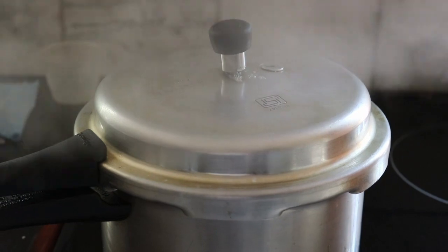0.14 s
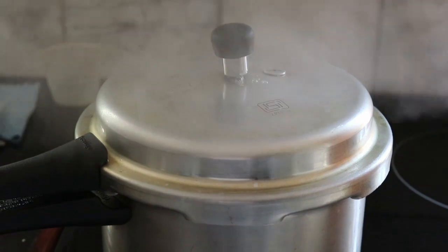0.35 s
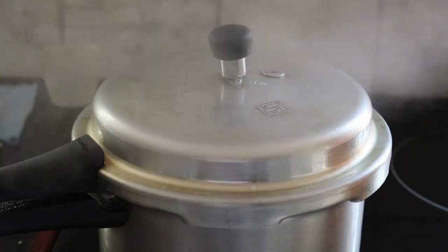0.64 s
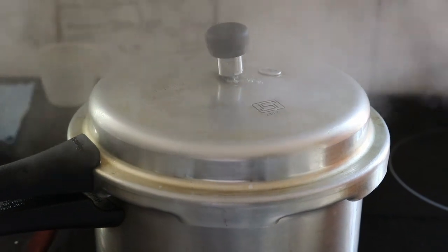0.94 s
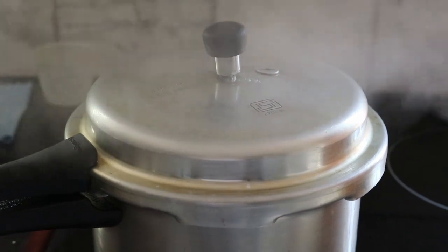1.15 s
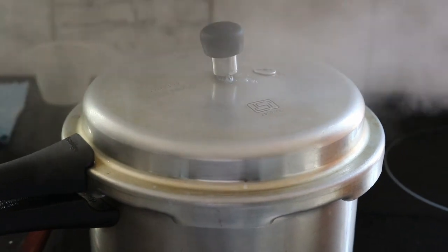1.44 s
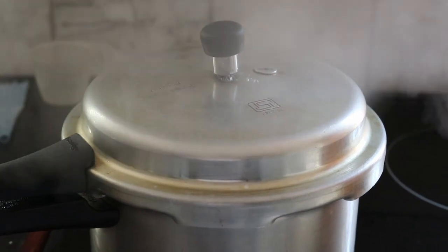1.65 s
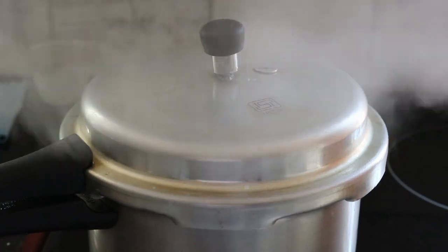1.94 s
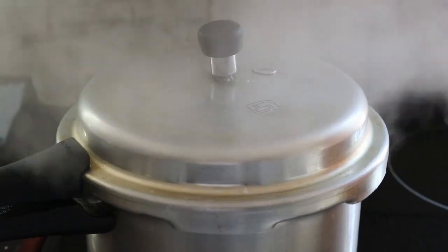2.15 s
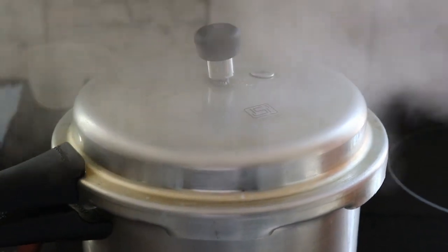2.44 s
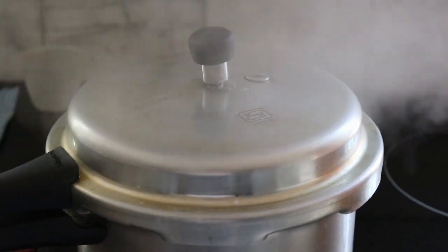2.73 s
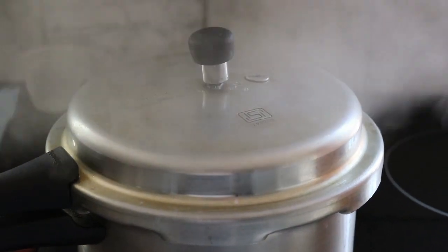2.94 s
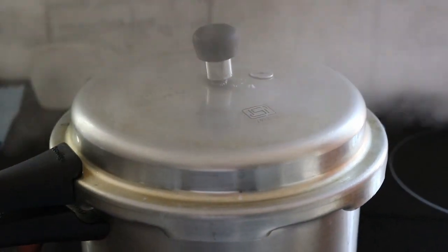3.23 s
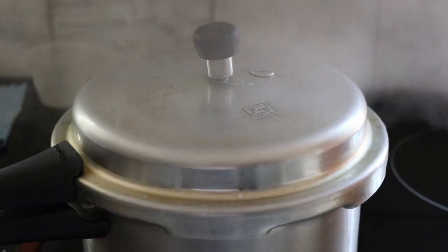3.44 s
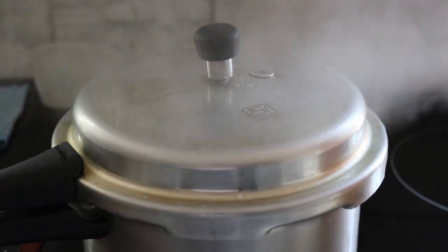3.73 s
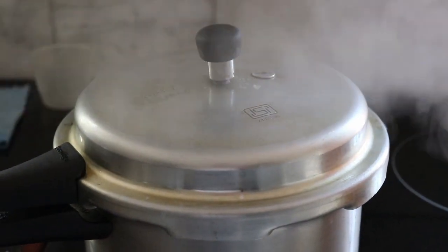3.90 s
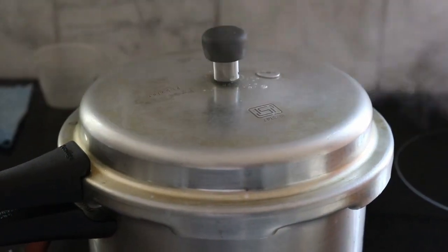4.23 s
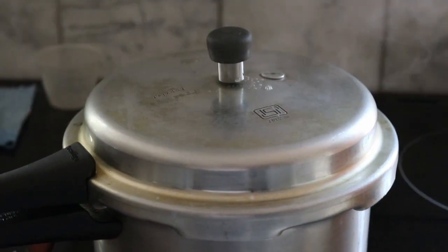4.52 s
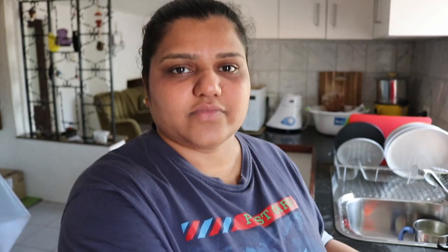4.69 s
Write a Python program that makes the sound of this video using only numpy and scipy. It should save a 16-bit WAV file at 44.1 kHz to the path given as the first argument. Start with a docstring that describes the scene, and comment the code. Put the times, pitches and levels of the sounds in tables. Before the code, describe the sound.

In a tiled kitchen, a close pressure cooker vents a loud, bright, steady hiss, fluttering gently under its rocking weight. Just after four seconds a few quick spurts end in a short hollow gasp, and reflections fade over faint rumble and leak. The background then abruptly becomes louder and duller, with a soft double knock and a sharp chattering clink.

```python
"""Pressure cooker venting in a tiled kitchen

A turbulent steam jet, filtered noise with narrow peaks and dips, hisses loudly and flutters under a rocking weight.
The weight settles with a short hollow gasp of resonant noise; reflections die away over rumble and a thin leak.
Then the background turns abruptly louder and duller, by a short fade between steady noises.
A soft double knock and one sharp, chattering clink follow, each built from decaying modes and noise bursts."""
import sys
import numpy as np
from scipy import signal
from scipy.fft import rfft, irfft
from scipy.io import wavfile

SR = 44100
rng = np.random.default_rng(int(sys.argv[2]) if len(sys.argv) > 2 else 0)


def persist_wave(psi):
    """Save psi, clipped to +-1, as 16-bit WAV."""
    counts = np.round(np.clip(psi, -1, 1) * 32767).astype(np.int16)
    wavfile.write(sys.argv[1], SR, np.atleast_2d(counts).T)


N = 214193
TIME = np.arange(N) / SR
BINS = np.fft.rfftfreq(N, 1 / SR)

# Relative spectra of room rumble, leaking pot and later background: frequency_hz, density_db (dB per Hz)
RUMBLE_COLOUR = [(15, -24), (28, -9), (44, 3), (62, 0), (77, -0.5), (95, -4.5), (160, -0.5), (260, -7.5),
                 (600, -19), (3000, -60)]
LEAK_COLOUR = [(100, -25), (200, -12), (280, -0.5), (400, -3.5), (520, -9), (1400, -8), (2500, -11.5),
               (4600, -15.5), (6800, -3.5), (8500, -11), (11000, -7), (15500, -16)]
LATER_COLOUR = [(15, -41), (25, -10), (79, -4.5), (148, -15.5), (421, -13), (826, -22), (1140, -20),
                (1490, -25), (3090, -28.5), (3340, -23), (3930, -27), (4380, -33), (9300, -30.5),
                (15500, -48)]
# Channel balance of the later background: frequency_hz, left_minus_right_db
LATER_LEAN = [(30, 7), (80, -1), (160, 4), (300, -3.5)]
CHANGE_S = 4.621  # when the background changes

# Decay of the tile reflections: frequency_hz, t60_s
REFLECTION_DECAY = [(200, 0.22), (1400, 0.57), (4000, 0.5), (7000, 0.46), (11000, 0.42), (15000, 0.27)]

# Touches of the chattering clink: start_s, level_db
CLINK_TOUCHES = [(4.8286, -19), (4.8304, -12.5), (4.8319, -21)]
# Modes of the small hard thing: pitch_hz, level_db, t60_s
CLINK_MODES = [(2000, -16, 0.023), (3149, -31, 0.015), (5540, 2.5, 0.018), (6420, 4.5, 0.032),
               (6420, -11, .2), (7490, -6, 0.026), (8190, -6, 0.038), (12200, -22, .012)]
# Soft blows: start_s, level_db, contact_s, left_minus_right_db
KNOCK_BLOWS = [(4.7596, -29, 0.00037, 7), (4.7688, -21.5, .0011, 5.5)]
# Modes of the knocked body: pitch_hz, level_db, t60_s
KNOCK_MODES = [(72.7, -5, 0.23), (160, -10.5, 0.14), (265, -9, 0.061), (590, 4.5, 0.013),
               (1180, -2.5, 0.021), (1700, -4, 0.014), (2450, -20, .008)]

# Hollow resonances woken as the weight settles: pitch_hz, half_width_hz, level_db, loudest_s, spread_s
HOLLOW_RESONANCES = [(304, 100, -64, 4.18, 0.054), (680, 77, -63.5, 4.17, 0.12),
                     (870, 33, -49.5, 4.175, 0.038), (1110, 86, -54.5, 4.125, 0.081),
                     (1360, 60, -56.5, 4.17, 0.085), (1720, 87, -57, 4.18, 0.049),
                     (2090, 60, -68, 4.17, .05)]

# Relative spectrum of the jet: frequency_hz, density_db (dB per Hz)
JET_COLOUR = [(120, -72), (200, -41), (497, -34.5), (1380, -20.5), (1740, -17.5), (1840, -15), (2560, -9),
              (2750, -11), (3180, -6.5), (5110, -8), (6830, -1), (8500, -7), (10200, -1), (11400, -3),
              (15500, -19)]
# Narrow peaks and dips that fixed reflections leave in the hiss: frequency_hz, lift_db
REFLECTION_RIPPLE = [(689, 3.5), (883, 3), (1227, 3.5), (1378, 3), (1895, 1.5), (2089, 1), (2218, 3),
                     (2541, 2), (2929, 2), (4802, 2.0), (6395, -1.5), (6697, 4.5), (7084, 6), (7558, 0),
                     (7989, -10), (8398, 4), (9647, 5.5), (9905, 4), (10271, 0), (10508, 4), (10939, 5.5),
                     (11822, 6.5)]
# Likeness of the jet at left and right: frequency_hz, likeness (0 to 1)
JET_LIKENESS = [(100, 0.93), (700, 0.89), (3200, 0.81), (4200, 0.15), (5000, 0.97), (7000, 0.99),
                (8000, 0.13), (9500, 0.47), (15000, 0.52)]
# Phase between the two microphones: frequency_hz, left_lead_rad
JET_LEAD = [(0, 0), (2930, -0.3), (3880, -1.5), (4820, -0.3), (5430, -0.5), (7150, -1.3), (8350, -0.8),
            (8960, -2.3), (10600, -1.5), (11800, 0.5), (14700, -1.7), (16100, -1.6)]
# Channel balance of the jet: frequency_hz, left_minus_right_db
JET_LEAN = [(60, -4), (95, -2), (150, 0), (240, -3), (380, -2.5), (600, -0.5), (950, -1.5), (1500, -3.5),
            (2380, -2.5), (3770, -3), (5980, -4.5), (9470, -5.0), (15000, -2)]
# Slow drift of the steam pressure, before the jet's overall gain: time_s, relative_level_db
PRESSURE_DRIFT = [(0, -22), (.85, -23), (1.35, -22), (2.0, -23), (2.6, -23), (3.2, -22.5), (3.6, -23.5),
                  (3.85, -26), (4.1, -24.5)]
# Higher lifts of the weight, each letting out a spurt: centre_s, half_length_s, lift_db
SPURTS = [(.68, .05, 0.9), (3.765, .05, 2.5), (3.942, 0.038, 4), (4.097, 0.011, 2)]

# The rocking builds up and dies down
ROCK_HZ, ROCK_DB, ROCK_WIDEST_S, ROCK_SPREAD_S = 6.4, 0.9, 2.64, 0.64
# Low and top parts of the hiss: initial level, share of the gap's dB swing, slow growth
THROATY_DB, THROATY_SWING, THROATY_DB_PER_S = -0.97, 0.87, 0.32
FINE_DB, FINE_SWING, FINE_DB_PER_S = -1.22, 1.23, 0.55
# The sinking weight thins both ends of the hiss
SINK_S, THROATY_SINK_DB_PER_S, FINE_SINK_DB_PER_S = 3.972, 48, 27
SHUT_S, SHUT_FALL_S = 4.106, 0.017  # when the vent closes, and the time constant of the jet's decay

EDGE_HZ = 15780  # upper limit of the output band


def gain_of(db):
    """Logarithmic level: decibels to an amplitude ratio."""
    return 10 ** (np.asarray(db) / 20)


def evened(x):
    """Power normalization: a signal scaled to rms 1."""
    return x / np.sqrt(np.mean(x ** 2) + 1e-20)


def read(points, hz):
    """Linear interpolation of a table along a log-frequency axis."""
    f, value = np.transpose(points)
    return np.interp(np.log(hz + 1), np.log(f + 1), value)


def panned(lean_db):
    """Level-difference stereo: left and right gains sharing the difference equally in dB."""
    return gain_of(np.array([[.5], [-.5]]) * lean_db)


def add(mix, s, sound):
    """Superposition: a two-channel sound summed into the mix at time s."""
    part = mix[:, round(s * SR):][:, :sound.shape[1]]
    part += sound[:, :part.shape[1]]


def noise_pair(same):
    """Partial coherence: spectra of two white noises sharing a common component."""
    left, other = rfft(rng.standard_normal((2, N)))
    same = np.clip(same, 0, 1)
    right = same * left + np.sqrt(1 - same ** 2) * other
    return np.array([left, right])


def wobble(slow_hz, fast_hz):
    """Band-limited random modulation of rms 1 between two rates."""
    band = BINS / (BINS + slow_hz) / (1 + (BINS / fast_hz) ** 2)
    return evened(irfft(rfft(rng.standard_normal(N)) * band, N))


def ring(modes, count=8000):
    """Modal superposition: a struck body as a sum of exponentially decaying sines."""
    t = np.arange(count) / SR
    return sum(gain_of(db - 60 * t / t60) * np.sin(2 * np.pi * hz * t) for hz, db, t60 in modes)


def rush(colour, same, lean_db=0):
    """Stationary noise: two channels of overall rms 1 with a given spectrum."""
    spectrum = noise_pair(same) * gain_of(read(colour, BINS))
    return evened(irfft(spectrum * panned(lean_db), N))


def background(rumble_db=-74.5, leak_db=-64, later_db=-47):
    """Steady noise sources: rumble and the simmering, leaking pot give way to a louder, duller rush."""
    rumble = gain_of(rumble_db) * rush(RUMBLE_COLOUR, same=0.85)
    leak = gain_of(leak_db) * rush(LEAK_COLOUR, same=0.57, lean_db=-2.0)
    later = gain_of(later_db) * rush(LATER_COLOUR, same=0.21, lean_db=read(LATER_LEAN, BINS))
    fade_out = np.clip((CHANGE_S - TIME) / 0.016, 0, 1)
    fade_in = np.clip((TIME - CHANGE_S) / 0.02, 0, 1)
    return (rumble + leak) * fade_out + later * fade_in


def tail(size=20, count=180):
    """Diffuse reverberation: dense reflections off tiles, each band decaying at its own rate."""
    taps = np.zeros((2, SR))
    # one reflection of random sign in each slot of `size` samples, from sample `count` onwards
    starts = np.arange(count, SR - size, size)
    at = starts + rng.integers(0, size, (2, len(starts)))
    np.put_along_axis(taps, at, rng.choice([-1., 1.], at.shape), 1)
    hz, t, z = signal.stft(taps, SR, nperseg=256)
    decay = gain_of(-60 * t / read(REFLECTION_DECAY, hz)[:, None])
    echoes = signal.istft(z * decay, SR)[1]
    return echoes / np.linalg.norm(echoes[0])


def kitchen(x, wet_db, drift_hz=.9, count=3):
    """Time-varying reverberation: as hot air moves, several tails take turns at constant total power."""
    wet = 0
    for k in range(count):
        turn = np.sqrt(2 / count) * np.cos(np.pi * (drift_hz * TIME + k / count))
        wet = wet + signal.fftconvolve(x * turn, tail(), axes=1)[:, :N]
    return (x + gain_of(wet_db) * wet) / np.hypot(1, gain_of(wet_db))


def clink(crack_db=-4, crack_s=0.0025, lean_db=-6):
    """Repeated impact: something small and hard chatters, each touch a noise crack and a modal ring."""
    out, tone = np.zeros((2, N)), ring(CLINK_MODES)
    fade = np.exp(-np.arange(len(tone)) / SR / crack_s)
    bright = signal.butter(4, [1600, 11500], "band", fs=SR, output="sos")
    for s, db in CLINK_TOUCHES:
        crack = signal.sosfilt(bright, rng.standard_normal((2, len(tone))) * fade)
        touch = tone / abs(tone).max() + gain_of(crack_db) * crack
        add(out, s, gain_of(db) * touch * panned(lean_db))
    return out


def knocks(puff_db=-5, puff_s=0.0029, puff_hz=1900):
    """Contact-time filtering: two dull blows with a noise scuff; longer contact favours lower modes."""
    out, body = np.zeros((2, N)), ring(KNOCK_MODES)
    t = np.arange(len(body)) / SR
    dull = signal.butter(4, puff_hz, fs=SR, output="sos")
    for s, db, contact, lean_db in KNOCK_BLOWS:
        u = t / contact * 2
        push = (1 - u) * np.exp(-u)
        blow = signal.fftconvolve(body, push)[:len(t)]
        puff = evened(signal.sosfilt(dull, rng.standard_normal(len(t)))) * np.exp(-t / puff_s)
        knock = blow / abs(blow).max() + gain_of(puff_db) * puff
        add(out, s, gain_of(db) * knock * panned(lean_db))
    return out


def gasp():
    """Flow-excited resonance: slow steam swells several hollow resonances almost together, 1110 Hz first."""
    out = 0
    for hz, width, db, s, spread in HOLLOW_RESONANCES:
        moan = irfft(noise_pair(0.9) / (1 + ((BINS - hz) / width) ** 2), N)
        swell = np.exp(-((TIME - s) / spread) ** 2)
        out = out + evened(moan) * gain_of(db) * swell
    return out


def gap():
    """Flow modulation by the weight's opening, in dB: a steady rocking and a few higher lifts."""
    t = TIME - ROCK_WIDEST_S
    rocking = ROCK_DB * np.exp(-(t / ROCK_SPREAD_S) ** 2) * np.cos(2 * np.pi * ROCK_HZ * t)
    return rocking + sum(db * np.exp(-((TIME - s) / length) ** 2) for s, length, db in SPURTS)


def jet_spectrum(ripple_width_hz=65):
    """Turbulence noise coloured by a fixed reflection ripple, with channel level and phase differences."""
    ripple_db = sum(db * np.exp(-((BINS - hz) / ripple_width_hz * 2) ** 2) for hz, db in REFLECTION_RIPPLE)
    z = noise_pair(read(JET_LIKENESS, BINS)) * gain_of(read(JET_COLOUR, BINS) + ripple_db)
    lead = np.exp(np.array([[.5j], [-.5j]]) * read(JET_LEAD, BINS))
    return z * panned(read(JET_LEAN, BINS)) * lead


def jet(level_db=1.16, flutter_db=0.35, patchy_db=0.58):
    """Modulated turbulent jet: the rocking weight makes the steam flutter, then shuts it off."""
    z = jet_spectrum()
    # the width of the gap shifts the balance between large and small eddies
    gap_db = gap()
    sinking = np.maximum(np.minimum(TIME, SHUT_S) - SINK_S, 0)
    throaty_db = THROATY_DB + THROATY_DB_PER_S * TIME + THROATY_SWING * gap_db
    throaty_db = throaty_db - THROATY_SINK_DB_PER_S * sinking
    fine_db = FINE_DB + FINE_DB_PER_S * TIME + FINE_SWING * gap_db
    fine_db = fine_db - FINE_SINK_DB_PER_S * sinking
    # crossover weights by frequency
    low = read([(4000, 1), (5800, 0)], BINS)
    top = read([(8000, 0), (9800, 1)], BINS)
    hiss = 0
    for band, db in [(low, throaty_db), (1 - low - top, gap_db), (top, fine_db)]:
        band_db = db + patchy_db * wobble(slow_hz=3.1, fast_hz=20)
        hiss = hiss + irfft(z * band, N) * gain_of(band_db)
    flow_db = np.interp(TIME, *np.transpose(PRESSURE_DRIFT)) + flutter_db * wobble(slow_hz=4, fast_hz=14)
    shut = np.exp(-np.maximum(TIME - SHUT_S, 0) / SHUT_FALL_S)
    return evened(hiss) * gain_of(level_db + flow_db) * shut


def scene():
    """Superposition of the background, the reverberant small hits and the reverberant steam."""
    hits = kitchen(knocks() + clink(), wet_db=-9.5)
    steam = kitchen(jet() + gasp(), wet_db=-6.0)
    return background() + hits + steam


def record(dry):
    """Band limitation: the recorder's upper edge as a linear-phase low-pass filter."""
    low_pass = signal.firwin(1023, EDGE_HZ, window=("kaiser", 9), fs=SR)
    return signal.oaconvolve(dry, low_pass[None], "same")


dry = scene()
out = record(dry)
persist_wave(out)
```